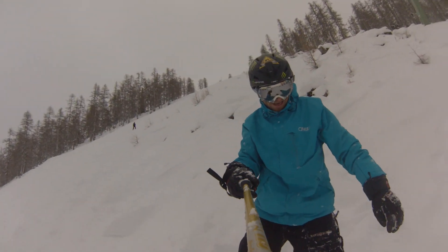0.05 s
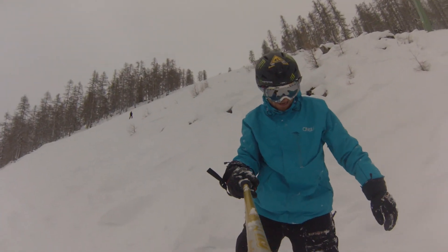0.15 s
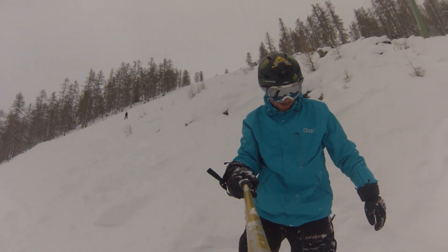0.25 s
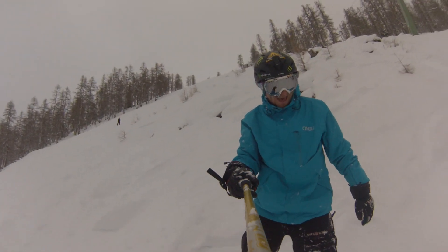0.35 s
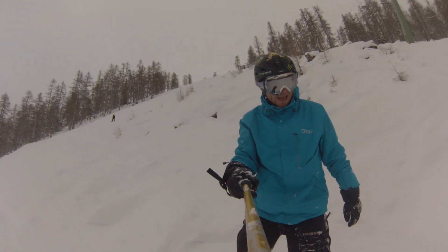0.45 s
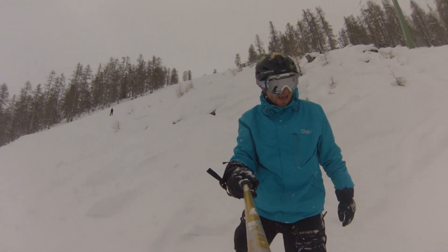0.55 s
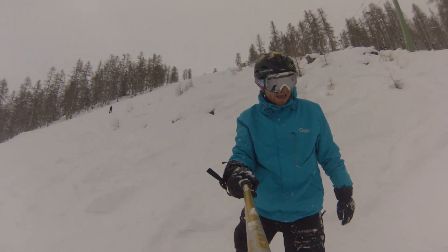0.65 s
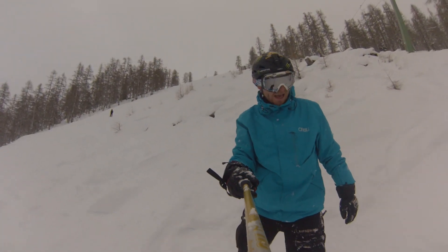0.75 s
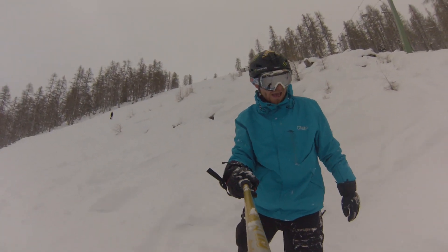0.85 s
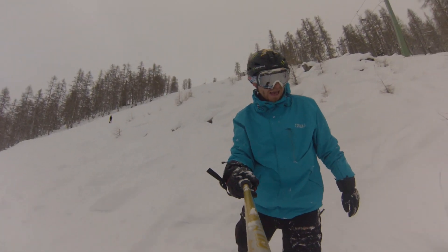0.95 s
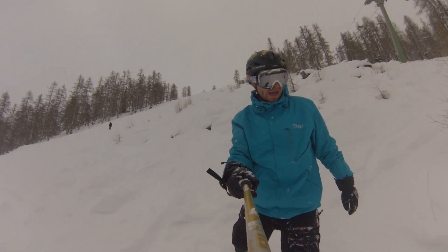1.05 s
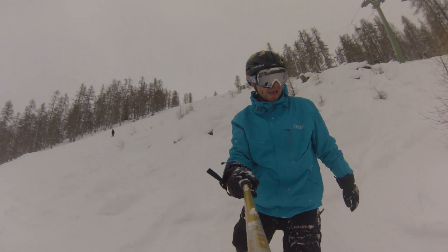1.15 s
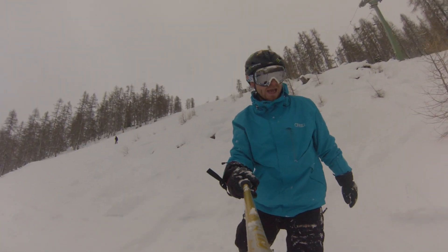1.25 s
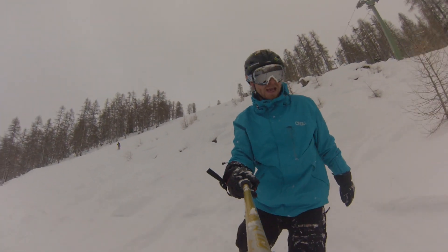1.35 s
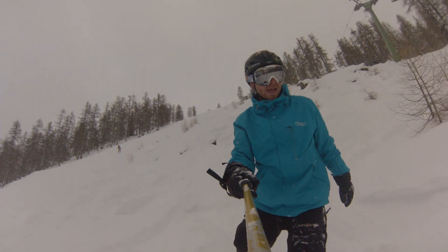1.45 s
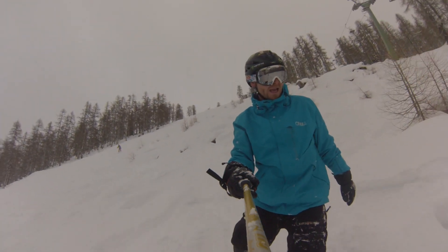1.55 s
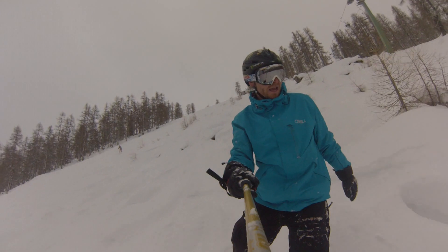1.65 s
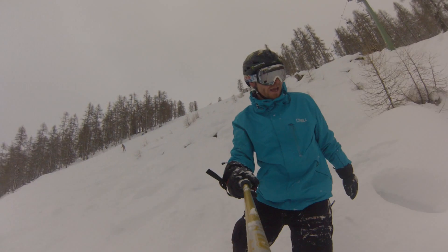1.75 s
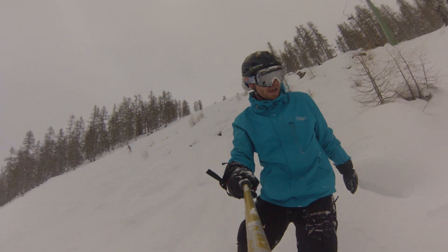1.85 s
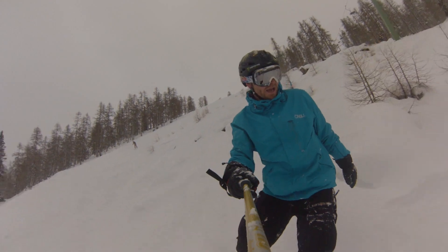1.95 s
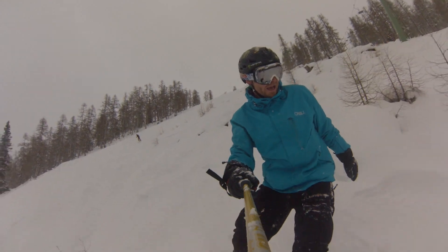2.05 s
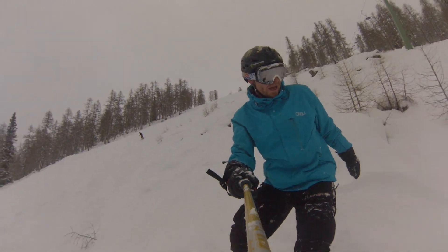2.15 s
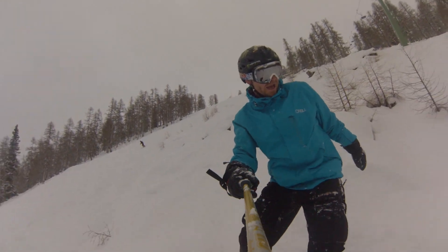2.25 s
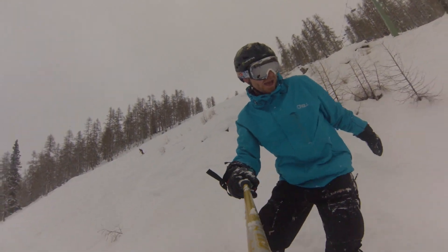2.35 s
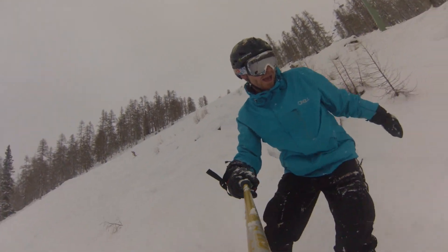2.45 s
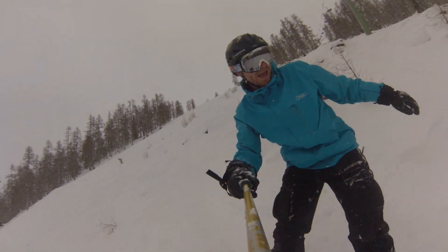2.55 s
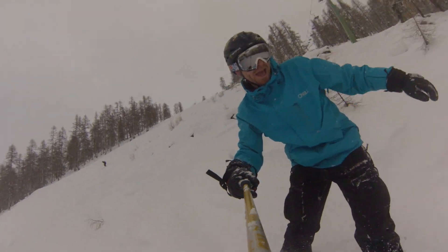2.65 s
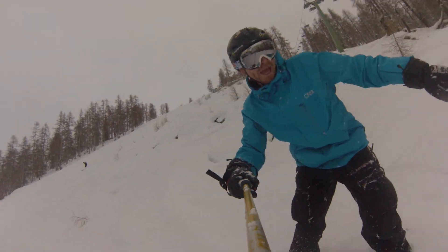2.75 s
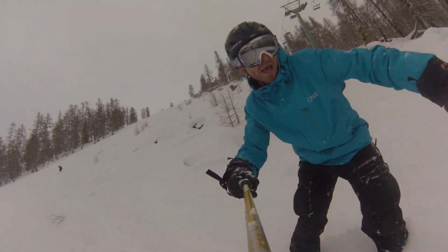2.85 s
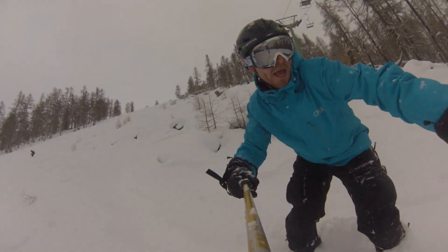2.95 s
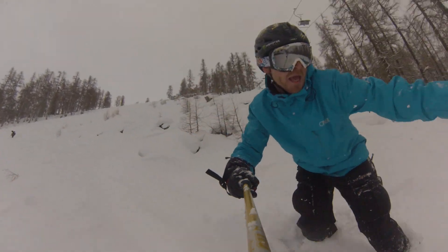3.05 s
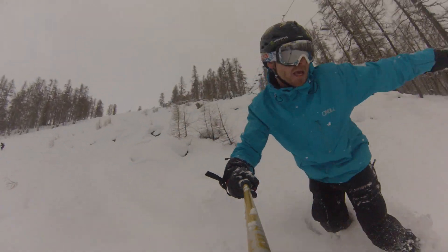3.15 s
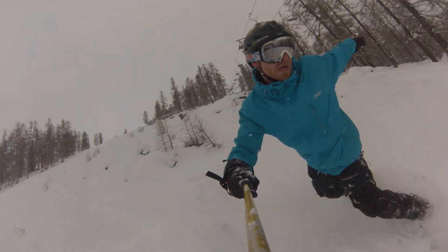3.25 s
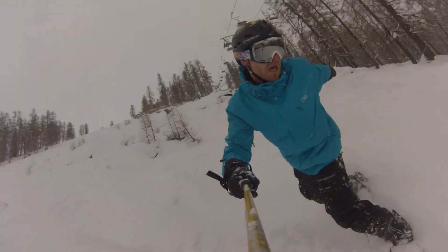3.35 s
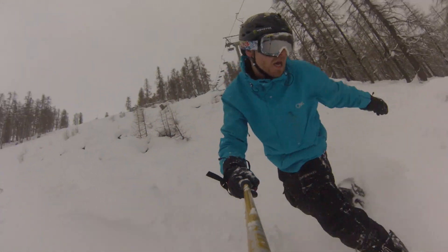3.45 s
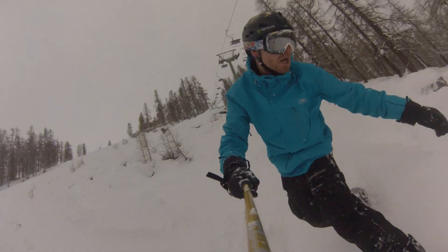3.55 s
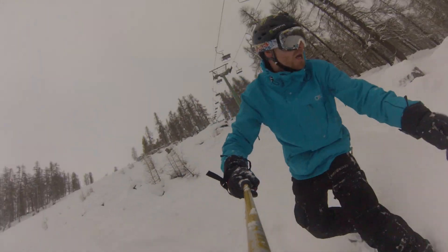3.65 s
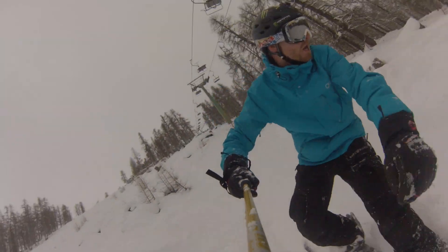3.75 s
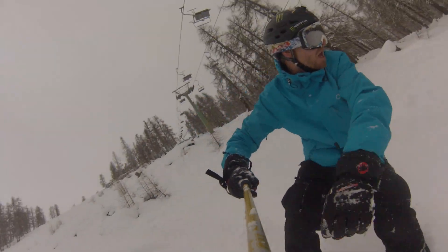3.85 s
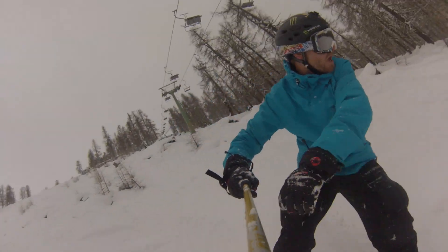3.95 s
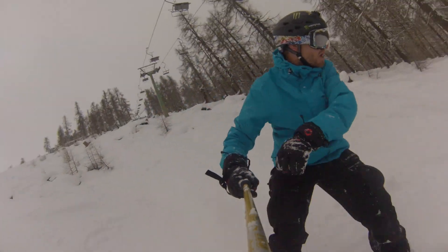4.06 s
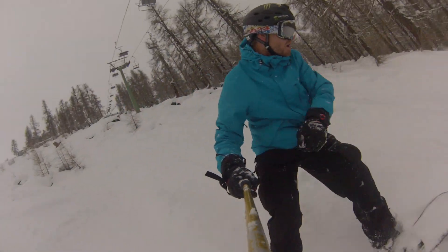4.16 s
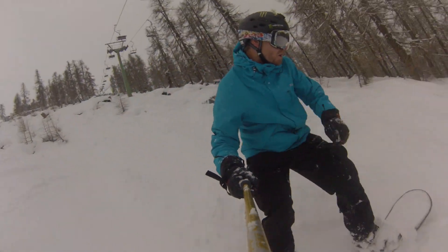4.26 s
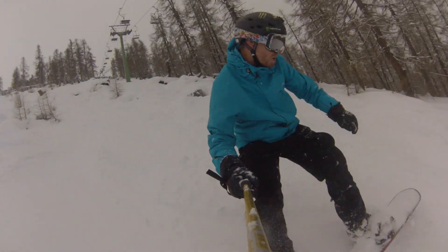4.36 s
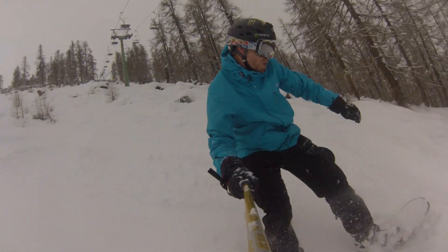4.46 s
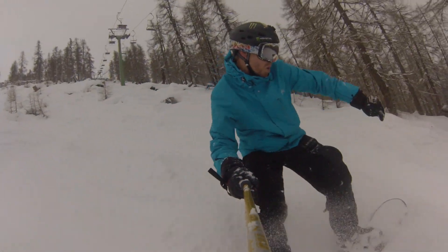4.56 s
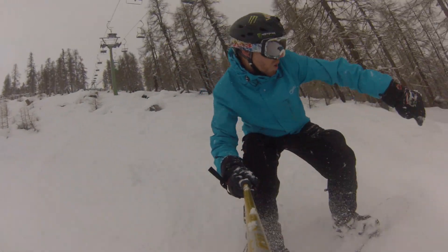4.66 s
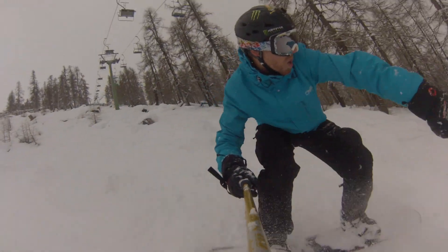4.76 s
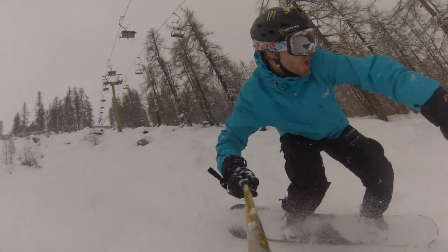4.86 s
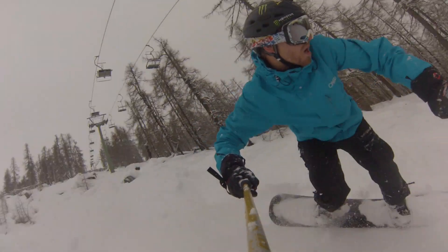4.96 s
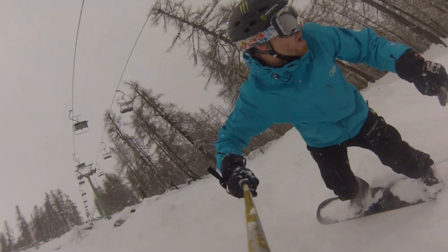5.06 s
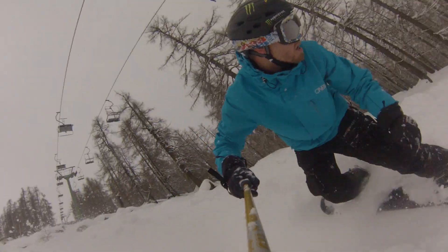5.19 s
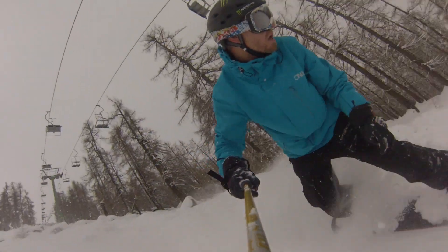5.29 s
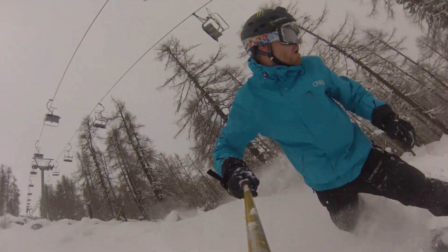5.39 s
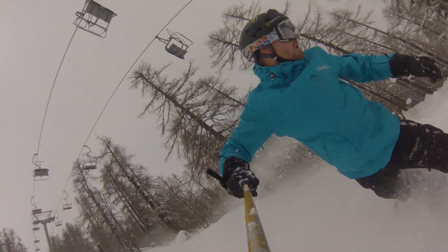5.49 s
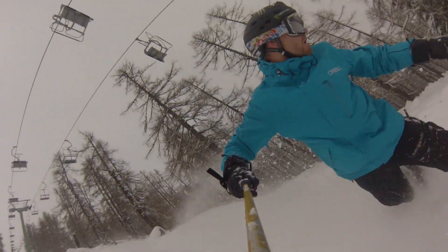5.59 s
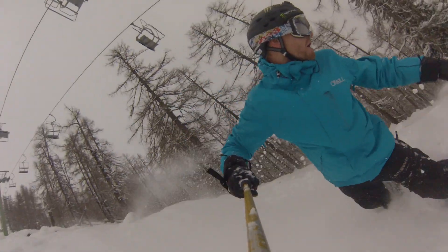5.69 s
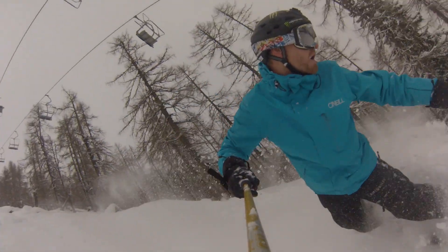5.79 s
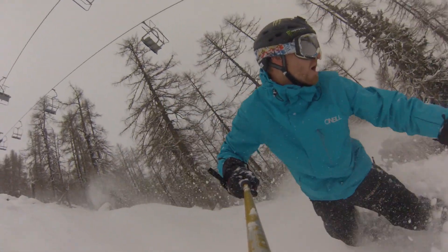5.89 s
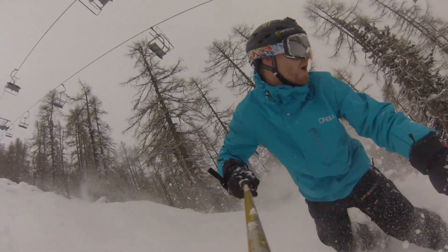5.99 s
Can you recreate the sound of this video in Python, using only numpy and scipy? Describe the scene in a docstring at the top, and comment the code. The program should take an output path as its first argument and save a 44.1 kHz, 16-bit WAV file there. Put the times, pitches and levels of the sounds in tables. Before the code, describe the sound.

Deep wind buffets and thumps the microphone over the muffled crunch of a snowboard riding through powder, growing louder.

```python
"""Wind booms and thumps over the muffled crunch and hiss of a snowboard riding through powder.
The rider holds a camera in a sealed case on a pole: gusts shove the case and jolts set it swinging.
Snow packs under the board, sprays off its edge in the turns, and ticks and spatters on the case.
A boot squeaks, the pole mount creaks and clacks over the bumps, and a faint whine comes and goes."""
import sys
import numpy as np
from scipy import signal
from scipy.fft import rfft, irfft, next_fast_len
from scipy.io import wavfile
from scipy.ndimage import uniform_filter1d

SR = 44100
rng = np.random.default_rng(int(sys.argv[2]) if len(sys.argv) > 2 else 0)


def file_out(sig):
    """Save sig as 16-bit WAV at sys.argv[1]."""
    # one column per channel
    cols = np.atleast_2d(sig).T
    # limit, then scale
    lim = np.clip(cols, -1, 1)
    pcm = np.round(lim * 32767).astype(np.int16)
    wavfile.write(sys.argv[1], SR, pcm)


N = 265790
TIME = np.arange(N) / SR

# push of the headwind on the case, rising with speed: time_s, level_db
WIND_FORCE = [(0, -44), (0.3, -34.5), (0.7, -41.5), (1.1, -40.5), (1.5, -39), (1.72, -37.5), (2.3, -37),
              (2.7, -34), (3.1, -36), (3.27, -23), (3.62, -23), (3.85, -26.5), (4.3, -26), (4.65, -27.5),
              (5.03, -29.5), (5.3, -18), (5.5, -21.5), (5.88, -28)]
# big swirls of air that shove the case: time_s, boost_db
WIND_SHOVES = [(0.04, 13), (0.332, 10), (0.87, 8.5), (1.442, 13), (1.89, 4), (2.4, 6.5), (2.81, 0),
               (3.23, 3), (3.6, 3.5), (3.957, 7), (4.258, 3.5), (4.442, 5), (4.63, 4.5), (4.84, 5),
               (5.18, 2), (5.293, 6), (5.661, 7.5), (5.767, 7)]
# the wind drops away between gusts: time_s, width_s, depth_db
WIND_LULLS = [(1.69, 0.044, -5.5), (1.97, 0.011, -6), (2.12, 0.0057, -13), (2.35, 0.005, -9),
              (2.702, 0.008, -14), (3.32, 0.018, -8), (3.81, 0.026, -4.5), (3.9, 0.011, -7.5),
              (3.995, 0.009, -3), (4.118, 0.014, -11.5), (4.51, 0.029, -5.5), (5.0, .05, -0.5),
              (5.225, .008, -9), (5.46, 0.016, -2), (5.71, 0.0067, -4)]
# longer gusts that set the case booming: time_s, width_s, level_db
WIND_GUSTS = [(0.18, 0.021, -33.5), (1.14, 0.42, -42.5), (3.05, 0.064, -41.5), (3.52, 0.35, -37.5),
              (4.33, 0.24, -32), (4.66, 0.23, -43), (5.96, 0.18, -32.5)]
# tone of the wind's deep shaking, its boom, its rush and its puffs: pitch_hz, level_db
BUFFET_TONE = [(9, -10), (16, 2.5), (26, -0.5), (38, -0.5), (55, -9), (75, -24), (120, -45.5), (200, -67.5)]
BOOM_TONE = [(45, -7.5), (65, -2.5), (80, -0.5), (92, 3), (102, -7), (122, -20.5), (150, -25), (200, -36),
             (320, -63)]
RUSH_TONE = [(90, -5), (160, 4.5), (200, 3.5), (260, 2), (400, -2.5), (600, -4.5), (850, -8), (1100, -16.5),
             (1500, -21.5), (4000, -42)]
PUFF_TONE = [(130, 16), (200, -2), (290, -6), (450, -7), (620, -6), (900, -18), (1500, -23)]
# how hard the board presses on the snow, heard as crunch: time_s, level_db
BOARD_PRESSURE = [(0, -71.5), (0.8, -76), (1.6, -72), (2.2, -74.5), (2.5, -70.5), (3.2, -68), (3.45, -64.5),
                  (3.66, -69), (4.08, -66.5), (4.2, -63.5), (4.8, -65), (4.94, -62.5), (5.1, -65.5),
                  (5.33, -62.5), (5.6, -66.5), (5.86, -63.5), (6.02, -60.5)]
# the edge bites in a turn: start_s, hold_s, level_db, extra_treble_db
EDGE_BITES = [(4.052, 0.11, -69, -1), (4.17, 0.14, -67.5, 0), (4.35, 0.12, -65, -3.5),
              (4.561, 0.033, -56, -5), (4.638, 0.071, -63, -1)]
# the board digs in and ploughs up a heap: time_s, width_s, level_db
SNOW_HEAPS = [(3.285, 0.014, -57.5), (3.789, 0.012, -56), (4.591, 0.022, -44.5), (5.313, 0.004, -55)]
# thrown powder showers the case: time_s, width_s, level_db
POWDER_SHOWERS = [(5.23, 0.042, -66.5), (5.47, 0.26, -71), (5.65, 0.041, -66.5), (6.02, 0.028, -67)]
# tone of packing snow and of ploughed snow: pitch_hz, level_db
CRUNCH_TONE = [(400, -7), (800, -9.5), (1030, -6), (1200, 0.5), (1380, 4), (1550, 0.5), (1720, -6),
               (2000, -3.5), (2250, -3.5), (2550, -17), (2950, -25), (3800, -12)]
HEAP_TONE = [(120, 23), (250, 7.5), (400, 14.5), (800, 0.5), (1250, 10), (1700, -2), (2250, 5.5),
             (3000, -14), (5200, -8), (9000, -42), (15000, -40)]
# ringing stirred by the edge's spray and by falling powder: pitch_hz, width_hz, level_db
SPRAY_RINGS = [(2245, 430, 9.5), (3600, 490, -2.5), (4045, 350, 0.5), (5230, 930, 1.5), (6700, 510, -1.5),
               (7550, 840, -1.5), (8880, 1500, -3.5), (10870, 450, -4.5)]
POWDER_RINGS = [(3560, 150, 0), (4070, 350, 1.5), (4730, 220, -4), (5450, 430, -6), (6630, 460, -4),
                (7550, 970, -5.5), (9400, 2800, -11), (11000, 800, -10), (12400, 1600, -9)]
# tone of the steady background hiss: pitch_hz, level_db
HISS_TONE = [(180, -24), (300, 0), (348, 2), (1050, -6.5), (1420, -11), (1730, -8), (2250, -12), (2740, -4),
             (4350, -9.5), (5480, -5.5), (7020, -9), (10100, -11), (11100, -11), (14500, -9), (15500, -36)]
# narrow, flickering bands within that hiss: pitch_hz, width_hz, level_db
HISS_BANDS = [(1320, 540, -80.5), (2280, 530, -83.5), (5640, 270, -83), (11140, 460, -77)]
# spells of a faint, thin whine: start_s, hold_s, level_db
WHINE_SPELLS = [(0.02, .15, -84), (0.85, .15, -87), (1.12, 0.28, -82)]
# gusts and jolts that thump the case: time_s, level_db, pitch_hz
CASE_THUMPS = [(0.037, -33.5, 39), (0.138, -25, 94.4), (0.192, -24.5, 86), (0.318, -38, 86.5),
               (0.904, -30, 86), (1.026, -21, 87.4), (1.154, -29, 86), (1.222, -58, 181),
               (1.234, -25.5, 87), (2.03, -34, 84.7), (2.164, -33, 98), (2.567, -19, 88.4),
               (2.659, -29.5, 92), (3.056, -26, 89.6), (3.512, -40, 159), (3.61, -28.5, 91),
               (3.62, -38, 47), (3.771, -30.5, 93), (3.908, -26.5, 85), (4.26, -21, 49), (4.447, -18, 44),
               (4.644, -38.5, 170), (4.753, -21, 91), (5.304, -21.5, 35.7), (5.331, -37.5, 166),
               (5.519, -24.5, 85), (5.767, -26, 89)]
# a boot rubs in its binding: time_s, pitch_hz, level_db
BOOT_RUB = [(0.07, 1950, -93), (0.12, 2020, -78), (0.15, 2200, -60.5), (0.2, 2390, -74),
            (0.26, 2460, -71.5), (0.31, 2550, -100)]
# snow grains hit the case: start_s, level_db, tilt_db_per_decade, spot_pitch_hz, spot_level_db
GRAIN_HITS = [(0.8425, -44, -14, 6500, -49), (1.032, -51.5, -4, 11200, -60),
              (1.3849, -42.5, -13, 6800, -56), (1.8604, -49.5, -7, 1700, -65),
              (2.1346, -44, -4, 13100, -47), (2.369, -51, -16, 1310, -58), (2.409, -59, -16, 1400, -55),
              (2.506, -53, -11, 2340, -61), (2.871, -52, -18, 4060, -58), (3.7365, -51.5, 3, 5200, -51),
              (4.1954, -41, -12, 5260, -43), (4.651, -56, -10, 4040, -48)]
# notes of the struck case: pitch_hz, level_db, ring_s
CASE_NOTES = [(1430, -7.5, 0.011), (1950, -5.5, 0.0095), (2530, -5, 0.011), (3420, -10, 0.0072),
              (4740, -7, 0.0051), (5380, -7, 0.0076), (6760, 2.5, 0.002), (10170, -1.5, 0.0056),
              (11700, -7, 0.0092), (14100, 1, 0.0027)]
# the pole mount creaks under load: start_s, level_db, length_s, pitch_hz
MOUNT_CREAKS = [(1.57, -55.5, 0.016, 1630), (3.055, -54, .014, 1410), (3.379, -45.5, .009, 1310),
                (3.39, -50, 0.019, 1370), (3.426, -45, .005, 1380), (3.453, -43.5, 0.018, 1240),
                (3.471, -43, 0.0077, 1260), (3.498, -49.5, 0.011, 1330), (3.603, -41, 0.0043, 1270),
                (3.727, -42, 0.003, 1320), (3.734, -47.5, 0.0042, 1360), (3.786, -48, 0.0084, 1210),
                (3.799, -52.5, .03, 1340), (3.899, -45, 0.0043, 1240), (3.914, -52, .008, 1690),
                (3.941, -50, 0.015, 1390), (4.201, -46, 0.0032, 1300), (4.6385, -45.5, 0.006, 1280),
                (4.918, -57, 0.05, 1500), (5.313, -41, 0.0059, 1230), (5.371, -41, 0.0057, 1350),
                (5.3905, -42.5, 0.0057, 1270), (5.736, -44.5, 0.013, 1280), (5.933, -45, 0.0033, 1460),
                (5.982, -49, 0.0062, 1450), (6.009, -42, 0.015, 1290), (6.011, -45, .025, 1330)]
# ringing stirred by a creak: pitch_multiple, width_hz, level_db
CREAK_RINGS = [(.95, 270, 4), (1.18, 250, 1.5), (1.6, 330, -5)]
# clods of snow burst on the case: time_s, width_s, level_db
CLOD_BURSTS = [(2.307, .008, -76), (4.496, .004, -59), (5.04, 0.0015, -56), (5.886, .004, -60),
               (5.924, .003, -59), (5.9355, 0.0029, -57), (5.9765, 0.0025, -56.5), (5.995, .01, -60),
               (6.0058, 0.0011, -48.5), (6.02, 0.0079, -51)]
# tone of a bursting clod: pitch_hz, level_db
CLOD_TONE = [(1200, 5), (2200, 9), (2900, -14), (3800, 8), (4800, -9), (7500, -7), (9000, 1), (10000, -5),
             (11000, 1), (13500, -5), (15000, -10)]
# the mount slips and clacks on take-off: start_s, level_db
MOUNT_CLACKS = [(4.863, -45), (4.8742, -46), (4.8768, -39.5), (4.8805, -33.5), (4.8863, -29.5),
                (4.8872, -37), (4.8912, -39)]
# notes of the struck mount: pitch_hz, level_db, ring_s
MOUNT_NOTES = [(720, -17, 0.022), (910, -1, 0.02), (990, 1.5, 0.013), (1350, -2.5, 0.026),
               (1570, -6.5, 0.011), (1920, -12.5, 0.014), (2470, -7, 0.0056), (3640, -18, 0.012),
               (4800, -15.5, 0.016), (5300, -14, 0.01), (6900, -2, 0.0075), (8010, -15, 0.0093),
               (9500, -12, 0.0055), (11040, -10, 0.0045), (12400, -9, 0.0015)]


def from_db(db):
    """Turn decibels into a number to multiply by."""
    return 10 ** (np.asarray(db) / 20)


def unit_level(x):
    """Scale a sound to an average strength (rms) of 1."""
    return x / np.sqrt(np.mean(x ** 2) + 1e-20)


def in_time(rows):
    """Join timed points with straight lines, one curve for each value column."""
    times, *columns = np.transpose(rows)
    return [np.interp(TIME, times, column) for column in columns]


def swells(rows):
    """Each row (time_s, width_s, level_db) builds and fades in one smooth swell."""
    return sum(from_db(db) / (1 + ((TIME - s) / width) ** 2 / 2) ** 2 for s, width, db in rows)


def held(start_s, hold_s, rise_s, fall_s):
    """Rise to 1 by start_s, hold, then die away."""
    return np.exp(np.minimum(TIME - start_s, 0) / rise_s - np.maximum(TIME - start_s - hold_s, 0) / fall_s)


def crest(u):
    """A peak of height 1 between two shallow dips."""
    return (1 - u * u) * np.exp(-u * u / 2)


def drift(per_s):
    """A smooth random wobble of size about 1; a higher per_s makes it quicker."""
    step, warm_up = 40, 2000  # samples per slow step; slow steps skipped
    r = np.exp(-2 * np.pi * step * per_s / SR)
    slow = signal.lfilter([1], [1, -2 * r, r * r], rng.standard_normal(N // step + warm_up + 2))[warm_up:]
    return np.interp(np.arange(N) / step, np.arange(len(slow)), unit_level(slow))


def shaped(x, tone):
    """Give a sound the lows and highs of a tone table, falling steeply past its ends; strength 1."""
    hz, db = np.transpose(tone)
    size = next_fast_len(N)
    all_hz = np.maximum(np.arange(size // 2 + 1) * SR / size, 1)
    roll_off = (np.minimum(all_hz / hz[0], 1) * np.minimum(hz[-1] / all_hz, 1)) ** 4
    gain = from_db(np.interp(np.log(all_hz), np.log(hz), db)) * roll_off
    return unit_level(irfft(rfft(x, size) * gain, size)[:N])


def noise(tone):
    """Noise with the given tone; strength 1."""
    return shaped(rng.standard_normal(N), tone)


def evened(x, span_s):
    """Even out changes in loudness that are slower than span_s."""
    power = np.abs(signal.hilbert(x, next_fast_len(N))[:N]) ** 2 / 2
    width = max(int(span_s * SR), 1)
    smooth_power = uniform_filter1d(uniform_filter1d(power, width), width)
    return unit_level(x / np.sqrt(smooth_power + 1e-9))


def resonate(x, hz, width_hz):
    """Let through the part of a sound near one pitch."""
    r, angle = np.exp(-np.pi * width_hz / SR), 2 * np.pi * hz / SR
    feed = np.array([1, 0, -1]) * (1 - r * r) / 2
    return signal.lfilter(feed, [1, -2 * r * np.cos(angle), r * r], x + 1e-18)


def body(x, rings):
    """An object rings at several pitches; filtering twice keeps the gaps between them quiet."""
    return sum((-1) ** k * from_db(db) * resonate(resonate(x, hz, 0.92 * width), hz, 2 * width)
               for k, (hz, width, db) in enumerate(rings))


def strike(times, levels_db, hz, ring_s):
    """Blows of slightly random strength ring one note, which fades by 60 dB in ring_s."""
    blows = np.full(N, 1e-18)
    blows[(times * SR).astype(int)] = from_db(levels_db + 1.5 * rng.standard_normal(len(times)))
    r, angle = from_db(-60 / (ring_s * SR)), 2 * np.pi * hz / SR
    return signal.lfilter([0, np.sin(angle)], [1, -2 * r * np.cos(angle), r * r], blows)


def grains(per_s, spread_db):
    """Snow crystals break at random moments with random sizes."""
    sizes = from_db(spread_db * np.minimum(rng.exponential(1, N), 4)) * rng.choice([-1, 1], N)
    return sizes * (rng.random(N) < per_s / SR)


def wind(boom_db=-42.5, rush_db=-65, gust_rush_db=-35.5, shove_s=0.024, puff_s=0.015, lead_s=0.0076):
    """Swirls shove the case, it booms on its pole, and a fluttering rush follows the wind and gusts."""
    wind_db, = in_time(WIND_FORCE)
    extra_db = wind_db + 32  # how far above a middling wind
    flutter_db = 0.8 * drift(per_s=19)
    shove_db = sum(db * crest((TIME - s) / shove_s) for s, db in WIND_SHOVES) + flutter_db
    lull_db = sum(db * np.exp(-((TIME - s) / width) ** 2 / 2) for s, width, db in WIND_LULLS)
    gusts = swells(WIND_GUSTS)
    buffet = evened(noise(BUFFET_TONE), span_s=0.1)
    boom = evened(noise(BOOM_TONE), span_s=0.099)
    boom *= np.hypot(from_db(boom_db + 0.5 * extra_db), gusts)
    rush = unit_level(noise(RUSH_TONE) * from_db(2.1 * buffet + 2.0 * drift(per_s=22)))
    rush *= np.hypot(from_db(rush_db + 0.39 * (extra_db + lull_db)), from_db(gust_rush_db) * gusts)
    # a soft puff of air comes just before each thump
    puffs = swells([(s - lead_s, puff_s, db - 30) for s, db, _ in CASE_THUMPS]) * noise(PUFF_TONE)
    return from_db(lull_db) * (from_db(wind_db + shove_db) * buffet + boom) + rush + puffs


def board(glide_db=-74, treble_hz=6000):
    """Snow packs under the board, sprays off its edge, heaps up ahead and showers the case."""
    crunch_db, = in_time(BOARD_PRESSURE)
    crunch = shaped(grains(per_s=3000, spread_db=3.0) * from_db(2.0 * drift(per_s=22)), CRUNCH_TONE)
    clumps = from_db(1.1 * drift(per_s=45))
    spray = unit_level(body(grains(per_s=18000, spread_db=4.0) * clumps, SPRAY_RINGS))
    powder = unit_level(body(grains(per_s=10000, spread_db=3.5) * clumps, POWDER_RINGS))
    heap = shaped(grains(per_s=6000, spread_db=2.0), HEAP_TONE)
    # the edge sprays softly while gliding and harder as it bites; a bite's treble has its own level
    glide = from_db(glide_db + 0.36 * (crunch_db - crunch_db.mean()))
    treble = signal.sosfiltfilt(signal.butter(2, treble_hz, "high", fs=SR, output="sos"), spray)
    low_bite, high_bite = sum(from_db([[db], [db + treble_db]]) * held(s, hold, rise_s=0.017, fall_s=0.043)
                              for s, hold, db, treble_db in EDGE_BITES)
    edge = np.hypot(glide, low_bite) * (spray - treble) + np.hypot(glide, high_bite) * treble
    return from_db(crunch_db) * crunch + edge + swells(POWDER_SHOWERS) * powder + swells(SNOW_HEAPS) * heap


def hiss(level_db=-69.5, flicker_db=4.0):
    """A faint, steady hiss with a few narrow, flickering bands in it."""
    white = rng.standard_normal(N)
    bands = sum(from_db(db) * unit_level(resonate(white, hz, width) * from_db(flicker_db * drift(60)))
                for hz, width, db in HISS_BANDS)
    return from_db(level_db) * noise(HISS_TONE) + bands


def whine(pitch_hz=5636, wander_hz=4, fade_s=0.04):
    """A thin, slightly unsteady tone, with softer ones a fifth and an octave above."""
    phase = 2 * np.pi * np.cumsum(pitch_hz + wander_hz * drift(per_s=9)) / SR
    level = sum(from_db(db) * held(s, hold, fade_s, fade_s) for s, hold, db in WHINE_SPELLS)
    return level * (np.sin(phase) + from_db(-9) * np.sin(1.5 * phase) + from_db(-10) * np.sin(2 * phase))


def case_thumps(rise_cycles=0.7, fall_cycles=1.42, trim_db=-2):
    """A jolt swings the case back and forth a few times, building faster than it dies."""
    out = np.zeros(N)
    for s, db, hz in CASE_THUMPS:
        cycles = hz * (TIME - s)
        width = np.where(cycles < 0, rise_cycles, fall_cycles)
        out += from_db(db + trim_db) * np.exp(-(cycles / width) ** 2 / 2) * np.cos(2 * np.pi * cycles)
    return out


def boot_squeak(width_hz=520):
    """A boot rubs unevenly in its binding, and the pitch rises as it tightens."""
    hz, db = in_time(BOOT_RUB)
    rub = signal.sosfilt(signal.butter(2, width_hz / 2, fs=SR, output="sos"), rng.standard_normal((2, N)))
    phase = 2 * np.pi * np.cumsum(hz) / SR
    return from_db(db) * unit_level(rub[0] * np.cos(phase) + rub[1] * np.sin(phase))


def snow_ticks(trim_db=-3, spot_ring_s=0.0074):
    """Grains ring the case, each with its own brightness, and each struck spot adds its own note."""
    times, db, tilt_db = np.transpose(GRAIN_HITS)[:3]
    shell = sum((-1) ** k * strike(times, db + trim_db + note_db + tilt_db * np.log10(hz / 4000), hz, ring)
                for k, (hz, note_db, ring) in enumerate(CASE_NOTES))
    spots = sum(strike(np.array([s]), spot_db, hz, spot_ring_s) for s, _, _, hz, spot_db in GRAIN_HITS)
    return shell + spots


def mount_creaks(gap_s=0.0052, fade_db=9, grit_db=-26, slip_count=14):
    """A fading chatter of uneven slips, with a little grit, rings the body of the mount."""
    out, t = np.zeros(N + SR), TIME[:SR // 8]
    for s, db, length_s, hz in MOUNT_CREAKS:
        gaps = gap_s * (.5 + rng.random(slip_count))
        slip_times = np.minimum(np.cumsum(gaps) - gaps[0], t[-1])
        rub = from_db(grit_db) * rng.standard_normal(len(t))
        rub[(slip_times * SR).astype(int)] += from_db(0.53 * rng.standard_normal(slip_count))
        rub *= from_db(-fade_db * (t / length_s) ** 2)
        creak = body(rub, [(hz * multiple, width, ring_db) for multiple, width, ring_db in CREAK_RINGS])
        start = int(s * SR)
        out[start:start + len(t)] += from_db(db) * creak / np.abs(creak).max()
    return out[:N]


def snow_clods():
    """Each clod breaks up on the case in a brief, gritty spatter."""
    return swells(CLOD_BURSTS) * shaped(grains(per_s=9000, spread_db=3.0), CLOD_TONE)


def mount_clacks(trim_db=-4.5, slip_db=-11, slip_s=.005, slip_count=9):
    """A quick run of knocks rings the mount, with lighter slips grating just before and after each."""
    knock_times, knock_db = np.transpose(MOUNT_CLACKS)
    slip_times = knock_times[:, None] + slip_s * rng.uniform(-.25, 1, (len(knock_times), slip_count))
    times = np.append(knock_times, slip_times)
    db = np.append(knock_db, np.repeat(knock_db + slip_db, slip_count))
    return sum((-1) ** k * strike(times, db + trim_db + note_db, hz, ring_s)
               for k, (hz, note_db, ring_s) in enumerate(MOUNT_NOTES))


def scene():
    """Everything reaches one microphone inside the case."""
    mix = wind() + board() + hiss() + whine() + case_thumps() + boot_squeak()
    mix += snow_ticks() + mount_creaks() + snow_clods() + mount_clacks()
    return mix[None, :]


def record(dry):
    """The very highest treble is cut off steeply."""
    cutoff_hz = 15400
    return signal.sosfilt(signal.ellip(10, .1, 90, cutoff_hz, fs=SR, output="sos"), dry)


dry = scene()
out = record(dry)
file_out(out)
```